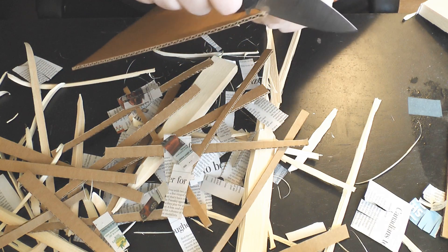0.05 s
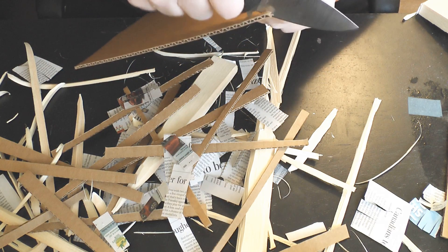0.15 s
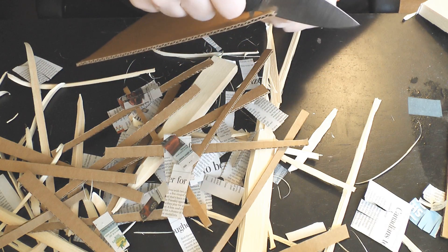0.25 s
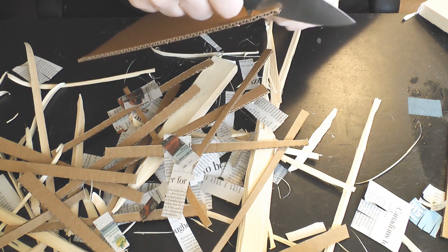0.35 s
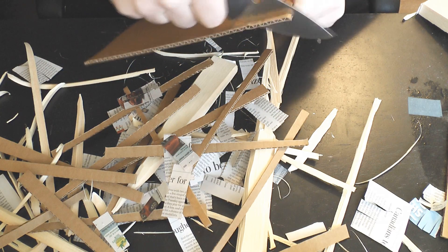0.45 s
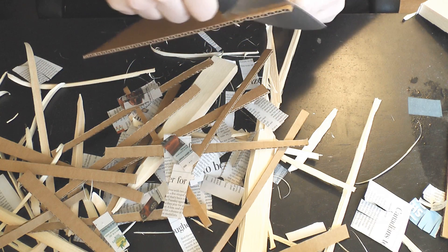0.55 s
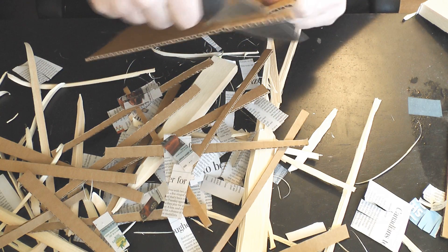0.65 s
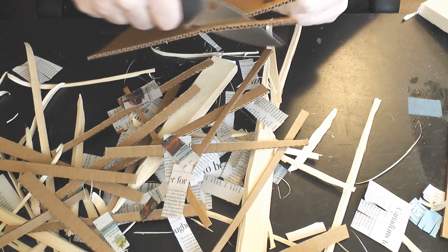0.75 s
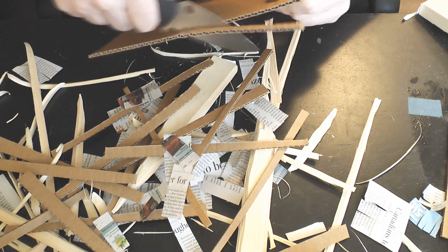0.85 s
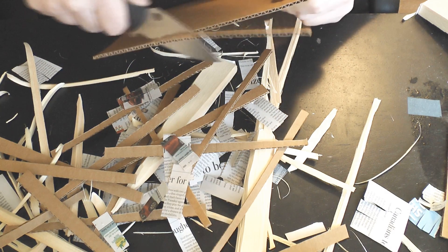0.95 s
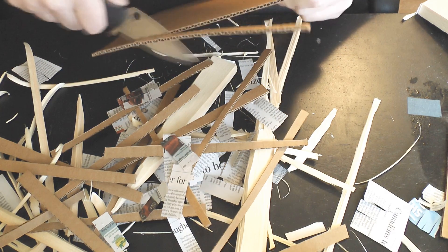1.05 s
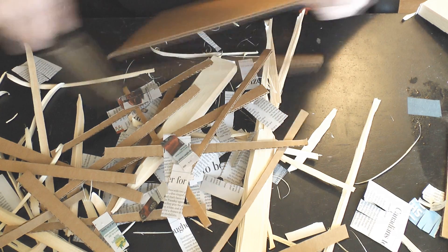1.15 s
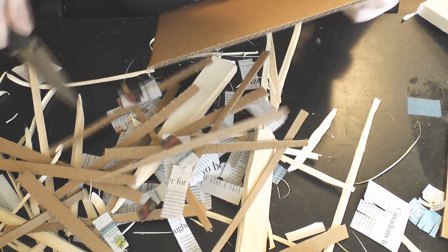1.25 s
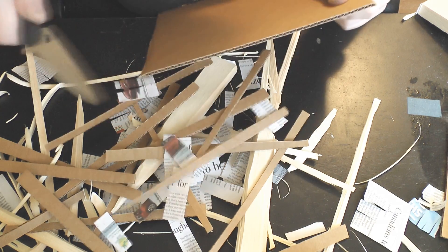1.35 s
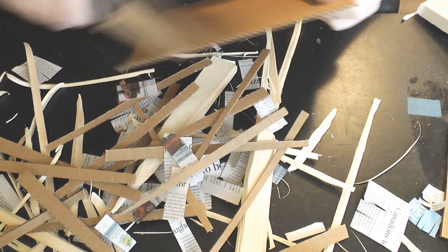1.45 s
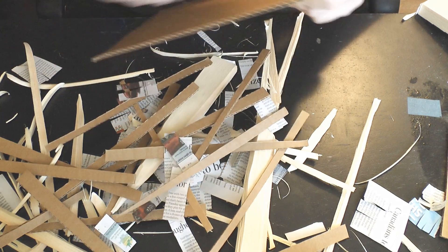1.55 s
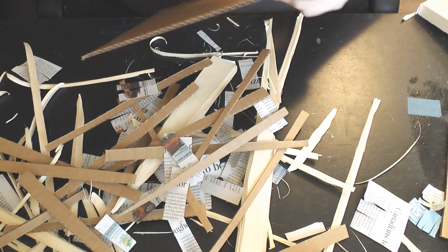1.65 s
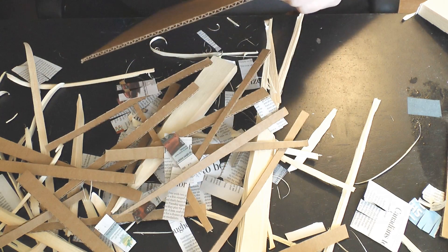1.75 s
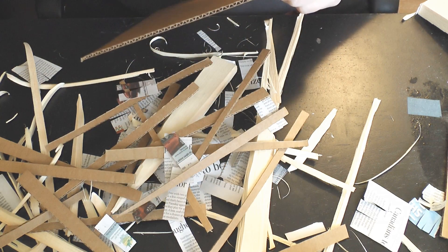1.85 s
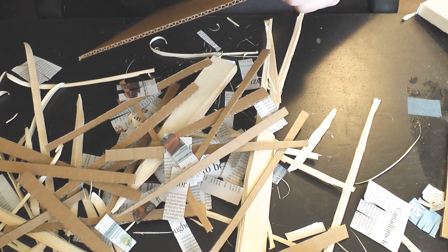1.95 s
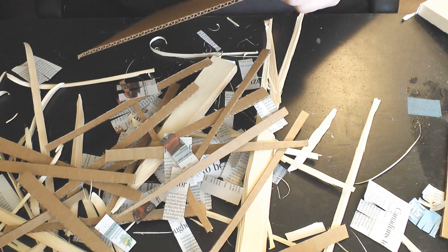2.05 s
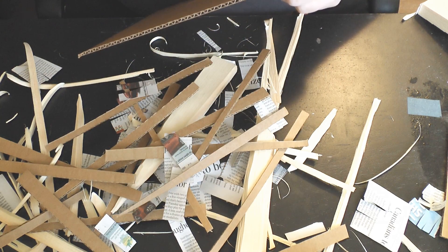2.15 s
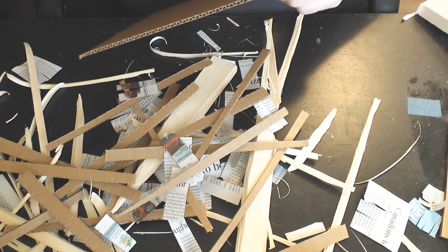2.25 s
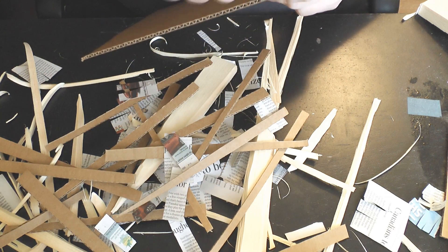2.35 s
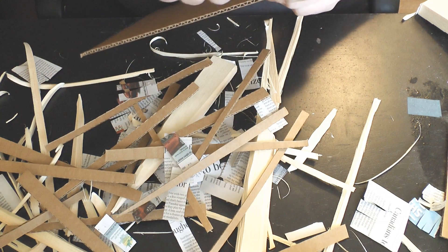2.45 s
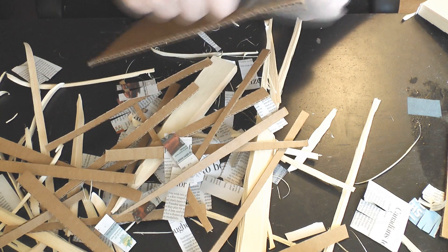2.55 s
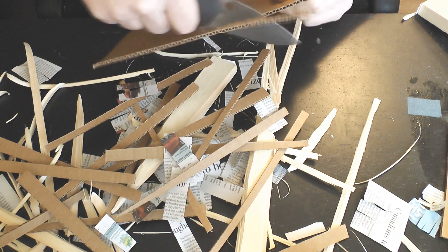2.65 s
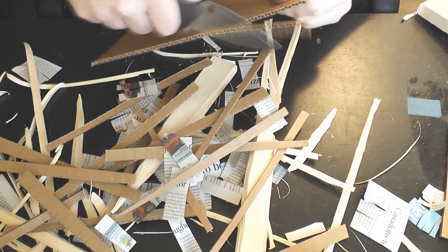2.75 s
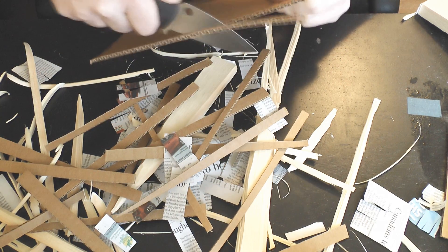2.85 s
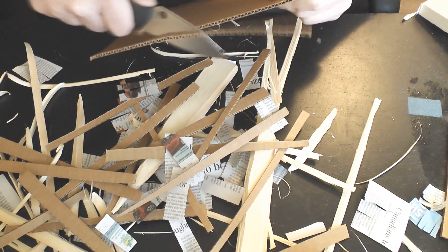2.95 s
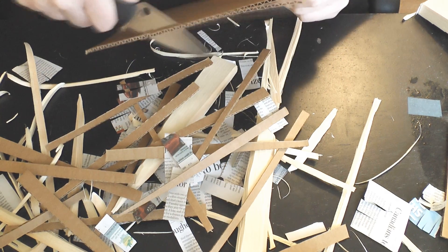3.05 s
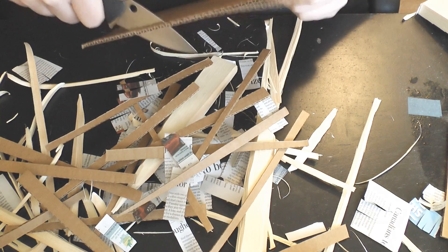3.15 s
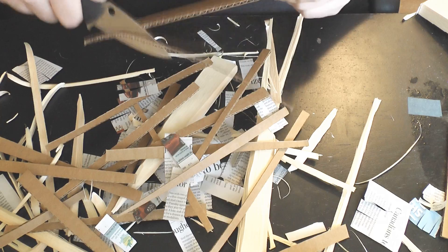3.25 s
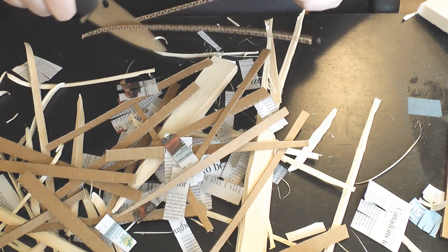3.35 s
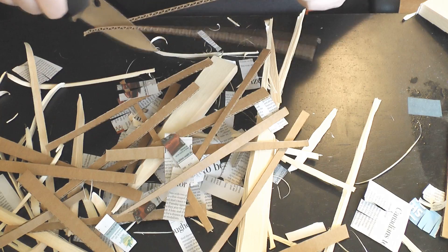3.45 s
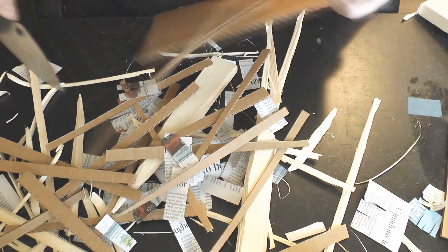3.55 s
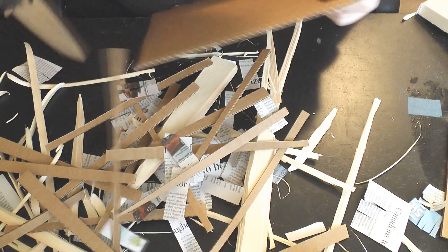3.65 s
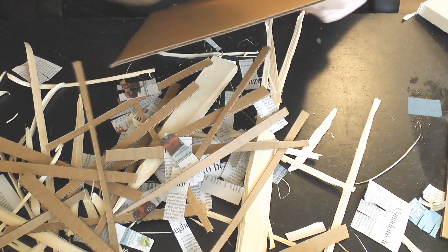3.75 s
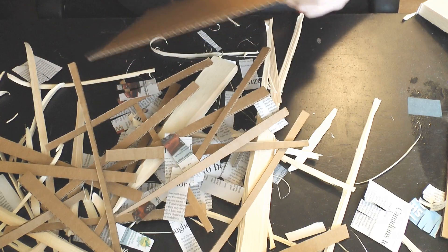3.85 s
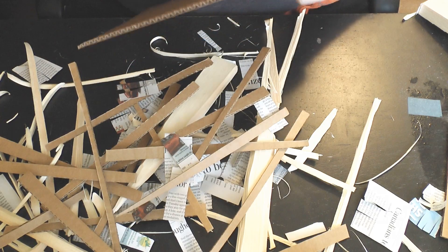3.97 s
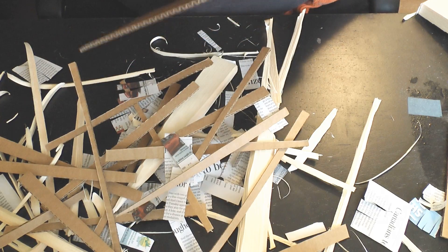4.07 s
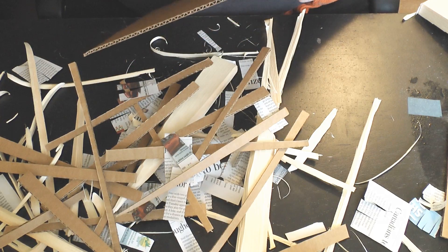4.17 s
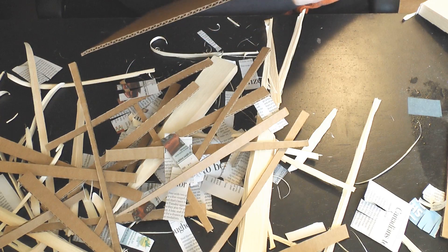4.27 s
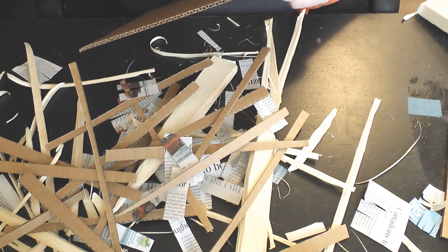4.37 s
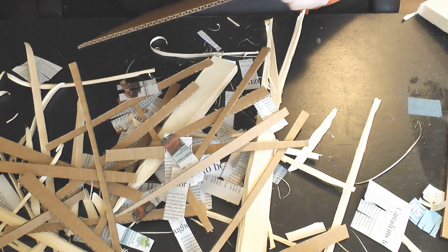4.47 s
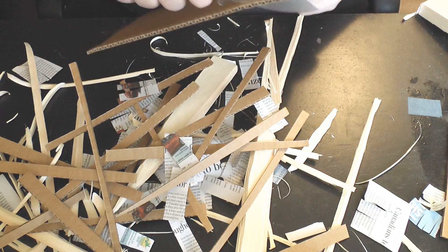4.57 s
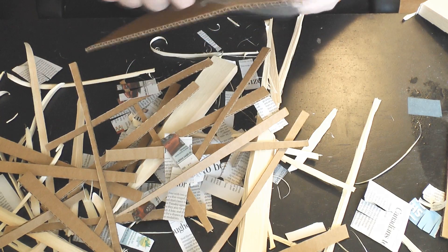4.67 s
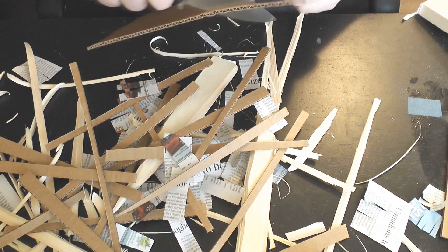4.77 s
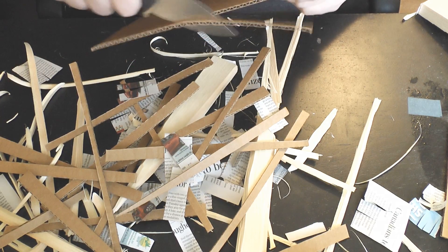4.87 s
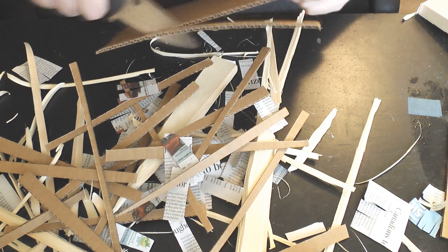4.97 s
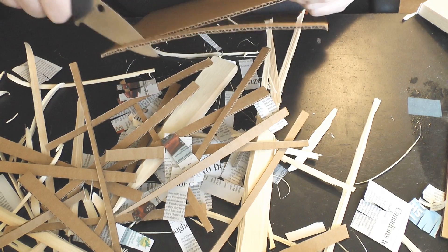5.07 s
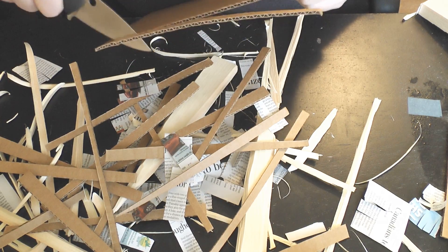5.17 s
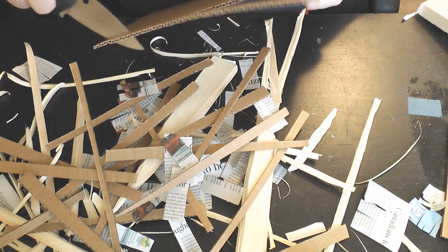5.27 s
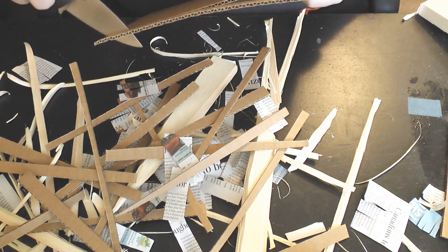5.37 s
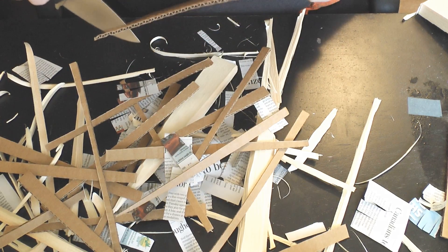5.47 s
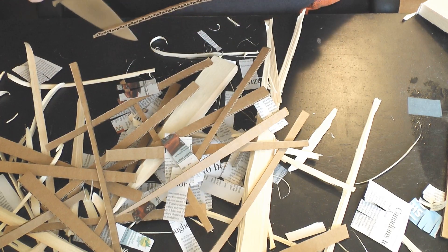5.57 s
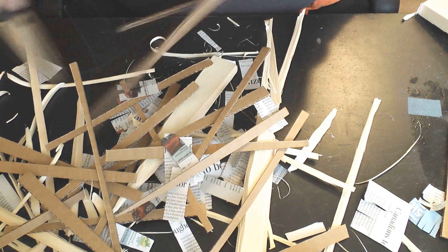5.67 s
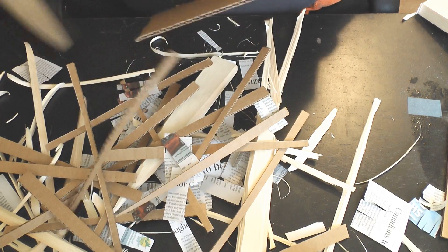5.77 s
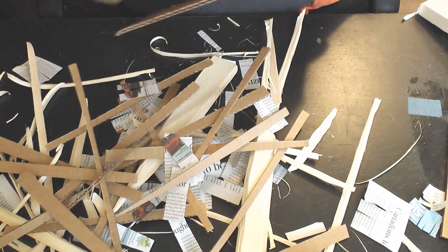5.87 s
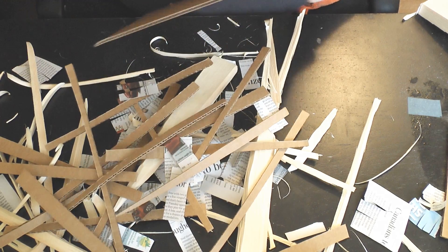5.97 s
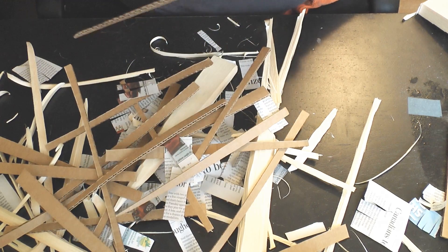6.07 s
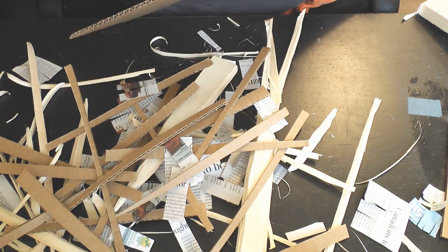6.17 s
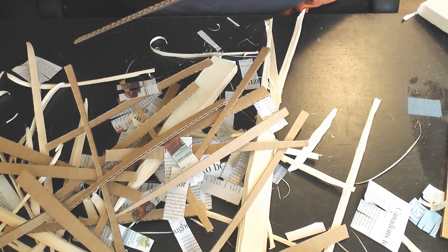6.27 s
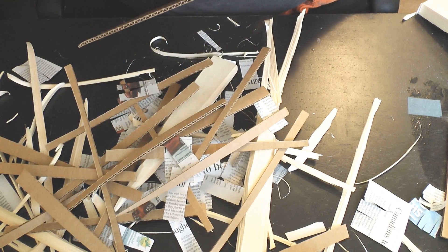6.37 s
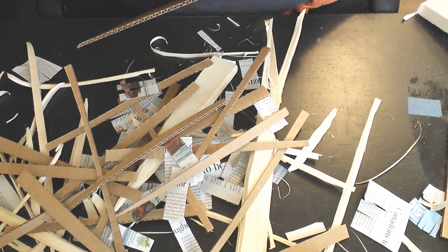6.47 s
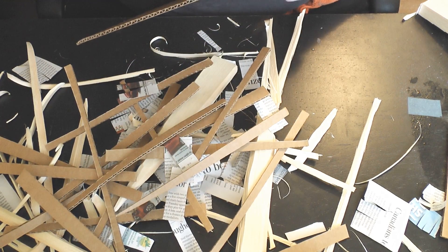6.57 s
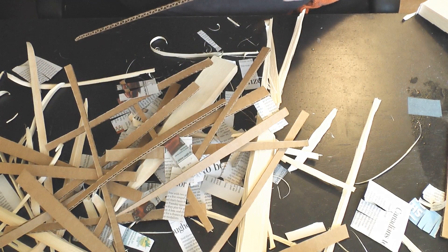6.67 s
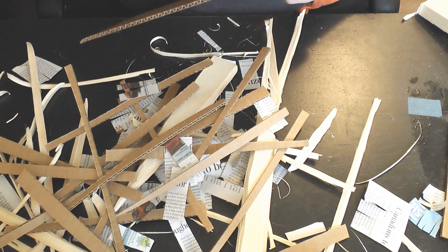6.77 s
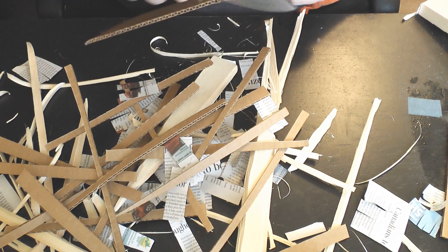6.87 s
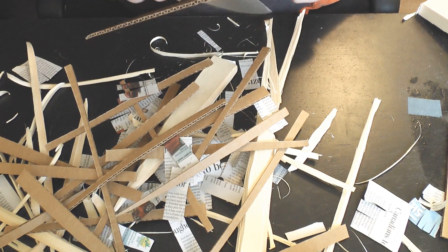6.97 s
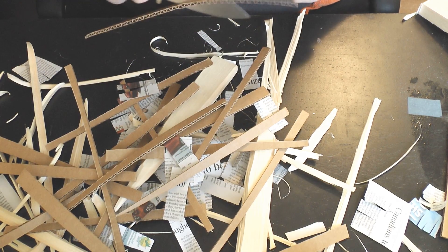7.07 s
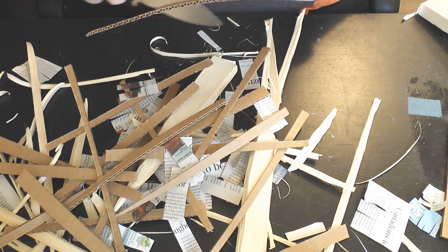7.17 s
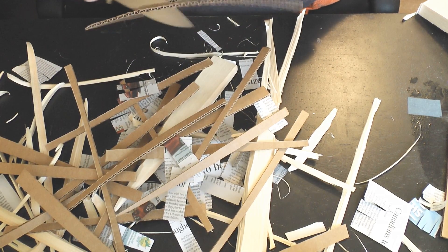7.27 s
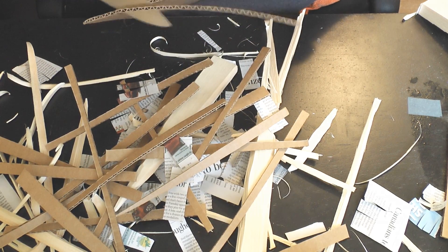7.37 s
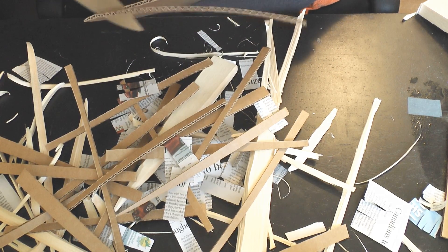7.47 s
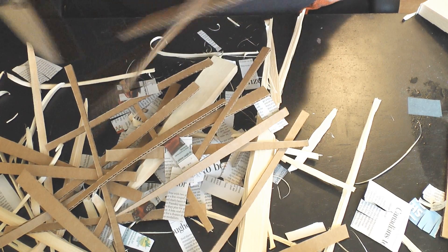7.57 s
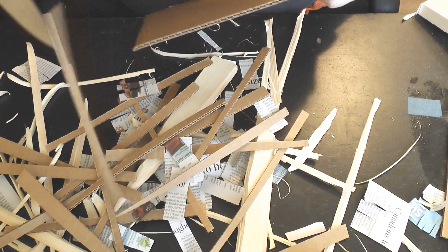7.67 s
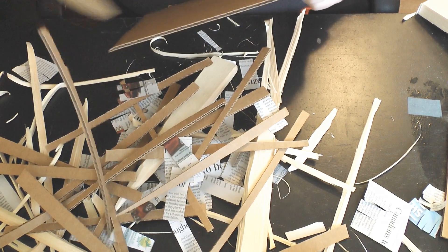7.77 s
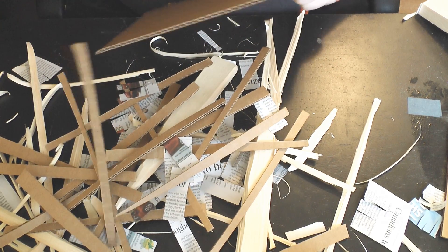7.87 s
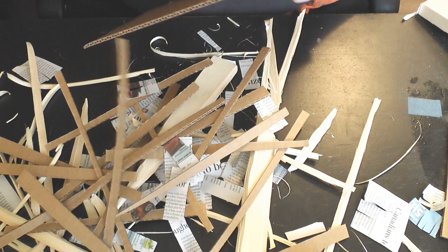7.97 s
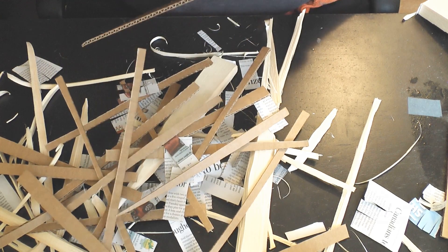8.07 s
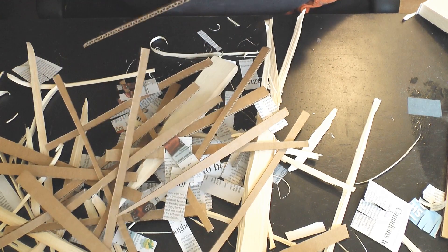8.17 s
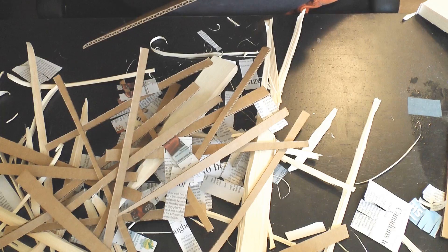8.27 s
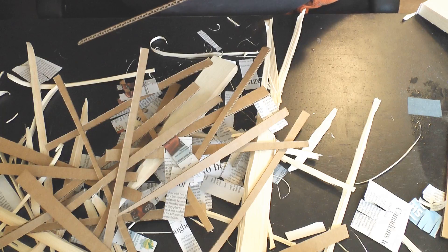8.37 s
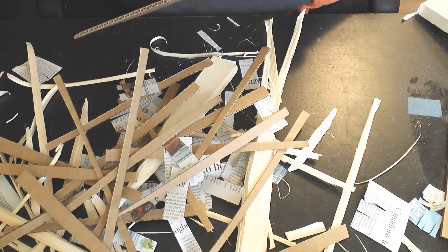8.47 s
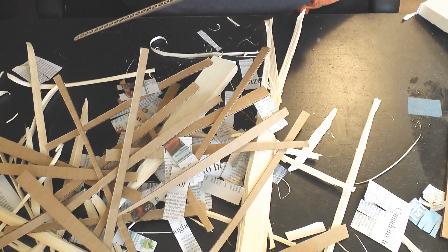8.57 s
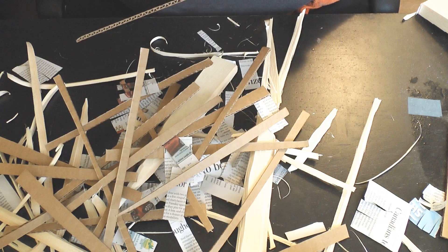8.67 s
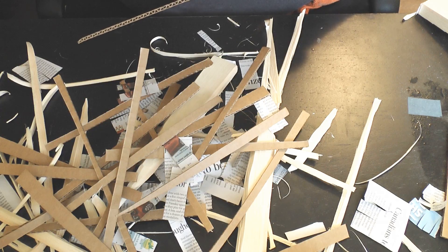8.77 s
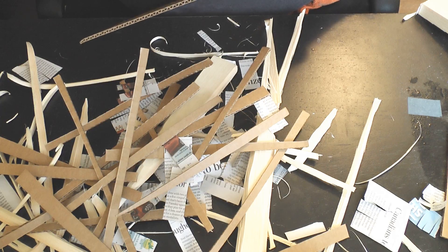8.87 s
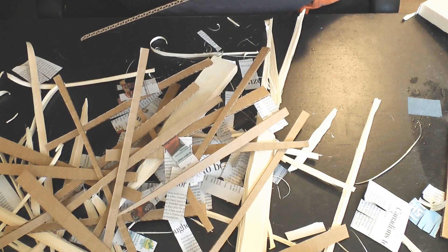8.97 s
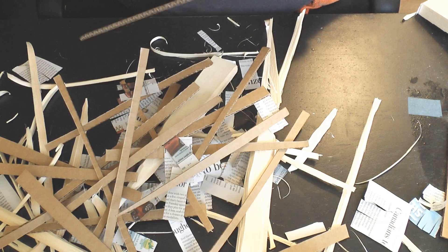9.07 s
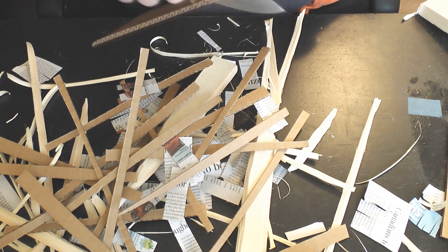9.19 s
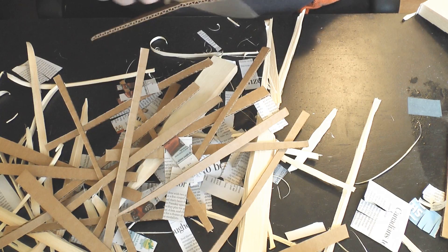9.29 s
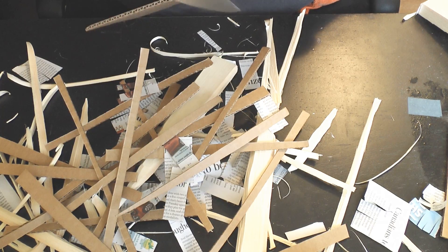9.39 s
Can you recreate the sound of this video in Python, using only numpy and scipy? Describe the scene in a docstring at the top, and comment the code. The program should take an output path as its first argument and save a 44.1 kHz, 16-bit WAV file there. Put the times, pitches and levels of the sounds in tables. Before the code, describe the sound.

Close, dry perspective in a small quiet room with a short reverberant tail and faint steady air. From 0 to 1.4 s a knife ticks on the edge of a corrugated cardboard sheet and rasps through in uneven pushes, gritty and bright, the sheet drumming underneath. A hard snap and low fluttering flap around 1.2 s free the strip; scraps tap the pile until 1.7 s, followed by soft rubbing and faint thin squeaks near 2 s. A second cut runs 2.3-3.8 s, its strip landing around 3.6 s. A third goes 4.25-5.8 s, snapping through at 5.6 s, then light drops and rubbing to 6.3 s. A fourth, 6.5-7.75 s, ends with a clear drop at 7.5 s and a low wobbling flap. Small taps and rustles continue to 8.5 s. At 8.8 s the fifth cut ticks in and rasps in separate strokes to the end, around 9.4 s.

```python
"""Cutting corrugated cardboard

A knife slices strips off a hand-held sheet of corrugated cardboard, over a table in a small room.
The blade ticks onto the edge and rasps through the flutes: coloured noise surging with every push.
The sheet drums as the cut deepens, then flaps free as a group of wandering sine modes.
Strips drop on a pile of offcuts as decaying noise bursts; rubs and thin squeaks are swelling noise."""
import sys
import numpy as np
from scipy import signal
from scipy.fft import rfft, irfft, next_fast_len
from scipy.io import wavfile
from scipy.ndimage import uniform_filter1d, map_coordinates

SR = 44100
rng = np.random.default_rng(int(sys.argv[2]) if len(sys.argv) > 2 else 0)


def bounce(signal):
    """Save signal as a 16-bit WAV file at the path given by the first command-line argument."""
    frames = np.transpose(np.atleast_2d(signal))
    limited = np.clip(frames, -1, 1)
    pcm = np.round(limited * 32767).astype(np.int16)
    wavfile.write(sys.argv[1], SR, pcm)


N = 415863  # length in samples


def amp(db):
    """Decibels to gain."""
    return 10 ** (np.asarray(db) / 20)


def unit(x):
    """Scale to rms 1."""
    return x / np.sqrt(np.mean(x ** 2) + 1e-20)


def along(points, hz):
    """Read (frequency, value) points on a log frequency axis."""
    f, v = np.transpose(points)
    return np.interp(np.log(hz + 1), np.log(f), v)


def wobble(rate):
    """A smooth random curve with this many knots a second."""
    knots = rng.standard_normal(int(N * rate / SR) + 4)
    return map_coordinates(knots, [np.arange(N) * rate / SR])


def filtered(x, gain):
    """Apply a gain that depends on frequency."""
    size = next_fast_len(N + SR // 2)
    hz = np.fft.rfftfreq(size, 1 / SR)
    return irfft(rfft(x, size) * gain(hz), size)[:N]


def coloured(x, spectrum, rings=(), size=4096):
    """Pass x through a causal filter of energy 1: a spectrum with resonances on it."""
    hz = np.fft.rfftfreq(size, 1 / SR)
    db = along(spectrum, hz)
    for ring_hz, width_hz, boost_db in rings:
        db = db + boost_db / (1 + (2 * (hz - ring_hz) / width_hz) ** 2)
    # folding the cepstrum makes the filter minimum phase
    cepstrum = irfft(np.log(amp(db) + 1e-6))
    cepstrum[1:size // 2] *= 2
    cepstrum[size // 2 + 1:] = 0
    response = irfft(np.exp(rfft(cepstrum)))
    return signal.oaconvolve(x, response / np.linalg.norm(response))[:N]


def add(track, start_s, sound):
    """Mix a sound into the track at its start time."""
    part = track[max(round(start_s * SR), 0):][:len(sound)]
    part += sound[:len(part)]


def fibres(rate, spread_db, friction):
    """Tiny breaks of uneven size, on average rate a second, over smooth friction noise."""
    sizes = amp(spread_db * np.clip(rng.standard_normal(N), -2, 2)) * rng.choice([-1, 1], N)
    breaks = unit(sizes * (rng.random(N) < rate / SR))
    return unit(breaks + friction * rng.standard_normal(N))


def burst(t60):
    """A puff of crushing paper: decaying noise of peak envelope 1, cut off after 0.2 s."""
    t = np.arange(SR // 5) / SR
    return rng.choice([-1, 1], len(t)) * amp(-60 * t / max(t60, .002))


# colour of the quiet room air: hz, level_db (per Hz, relative)
AIR_COLOUR = [(15, -53), (25, -18), (175, -9.5), (242, -7), (293, -15), (695, -15), (988, -25),
              (1650, -11.5), (2350, -11), (5570, -22), (8140, -33), (14000, -39), (16000, -42)]


def air():
    """The quiet room: steady noise in a fixed colour."""
    return amp(-54.5) * coloured(rng.standard_normal(N), AIR_COLOUR)


# the blade sits in the board and drags lightly, pushed or not: start_s, end_s, drag_db
CUTS = [(0.0, 1.374, -50), (2.302, 3.802, -46), (4.248, 5.825, -48), (6.48, 7.765, -44),
        (8.796, 9.432, -45.5)]
# pushes of the knife: start_s, attack_s, hold_s, rasp_db, drum_db (of the sheet, relative to rasp),
# hiss_db (fine fibres, relative to rasp)
PUSHES = [ (0.007, 0.059, .039, -35, -13, -7.5), (0.245, 0.046, 0.019, -29.5, -16.5, -14),
          (0.368, 0.027, 0.021, -23, -20.5, -10), (0.42, 0.018, 0.011, -27.5, -8.5, -7),
          (0.489, .035, .005, -32, -13, -9), (0.565, 0.093, 0.021, -24.5, -13.5, -5),
          (0.682, 0.022, 0.26, -29, -8, -2.5), (0.978, 0.015, 0.045, -30.5, -7, -4),
          (1.043, 0.042, 0.047, -24.5, -6, -1.5), (1.146, 0.023, 0.069, -37.5, -8.5, -2),
          (2.325, 0.019, .005, -31.5, -22.5, -8), (2.467, 0.059, 0.06, -24.5, -15.5, -8),
          (2.598, .018, 0.051, -35.5, -5.5, -4), (2.71, 0.056, 0.023, -33, -9, -3.5),
          (2.8, 0.13, 0.04, -29.5, -8, -3.5), (3.035, 0.029, 0.0098, -28.5, -6.5, -5.5),
          (3.171, 0.026, 0.021, -26.5, -8.5, -3.5), (3.323, .048, 0.066, -33.5, -10.5, -4.5),
          (3.445, 0.034, .003, -27.5, -10.5, 1), (3.501, 0.027, .009, -33, -14, -1),
          (3.588, 0.11, 0.031, -44.5, -6.5, -4), (4.283, .021, 0.13, -34.5, -18, -7),
          (4.442, .069, 0.015, -24, -14, -5.5), (4.584, 0.093, 0.027, -28, -10.5, -6.5),
          (4.747, 0.046, 0.036, -27.5, -8, -5.5), (4.814, .14, 0.084, -27.5, -9.5, -5),
          (5.201, 0.036, 0.025, -34.5, -9, -2.5), (5.38, 0.044, 0.053, -45, -10, -2),
          (5.584, .05, 0.0046, -28, -6.5, 0), (5.64, .016, 0.11, -52, 1, 0),
          (6.51, 0.034, .005, -32.5, -18, -3), (6.633, 0.046, 0.06, -25, -14.5, -7.5),
          (6.757, 0.088, 0.058, -27, -9.5, -4), (6.929, 0.15, 0.22, -31, -8.5, -2.5),
          (7.302, 0.068, 0.1, -29.5, -12, -2.5), (7.49, 0.015, 0.0093, -26, -9, 2),
          (7.633, .014, 0.05, -41.5, 1.5, -2.5), (8.825, .008, 0.027, -35, -17, -3),
          (8.884, 0.062, 0.016, -39, -15, -2.5), (9.047, 0.058, 0.031, -23, -13, -5),
          (9.178, 0.097, 0.017, -32, -11, -2), (9.336, 0.064, .05, -33.5, -14.5, -0.5)]
DRAG_DRUM_DB, DRAG_HISS_DB = -9.5, -8.5  # drumming and hiss relative to the drag
DRAG_FADE_S = 0.052  # time to enter or leave the board
BITE_DB, RELEASE_DB_PER_S = 15, 375  # swell over a push's attack; fall rate after its hold
UNSTEADY_DB, UNSTEADY_PER_S = 0.4, 28  # the hand never presses quite evenly


def effort():
    """Pushes swell, hold and let go on top of the drag: rasp dB, then drum and hiss dB relative to it."""
    t = np.arange(N) / SR
    power = np.full((3, N), amp(-120) ** 2)  # rasp, drum, hiss
    for start, end, db in CUTS:
        inside = np.clip(np.minimum(t - start, end - t) / DRAG_FADE_S + .5, 0, 1)
        levels = amp(db + np.array([0, DRAG_DRUM_DB, DRAG_HISS_DB]))
        power += np.outer(levels, inside) ** 2
    for start, attack, hold, db, drum_db, hiss_db in PUSHES:
        near = slice(*np.searchsorted(t, [start - attack, start + attack + hold + .5]))
        age = t[near] - start
        bite_db = -BITE_DB * np.maximum(1 - age / attack, 0) ** 2
        release_db = -RELEASE_DB_PER_S * np.maximum(age - attack - hold, 0)
        levels = amp(db + np.array([0, drum_db, hiss_db]))
        power[:, near] += np.outer(levels, amp(bite_db + release_db)) ** 2
    rasp, drum, hiss = 10 * np.log10(power)
    return rasp + UNSTEADY_DB * wobble(UNSTEADY_PER_S), drum - rasp, hiss - rasp


# the half-cut strip rings along with the blade: start_s, end_s, first_hz, last_hz, boost_db
STRIP_RINGS = [(0.2, 0.405, 2280, 2230, 10), (0.576, 0.794, 1970, 2300, 8.5), (2.493, 2.584, 6200, 6200, 7),
               (2.574, 2.815, 2180, 2270, 12.5), (2.848, 3.55, 1400, 1390, 3.5),
               (3.037, 3.26, 217, 218, 7.5), (4.62, 4.793, 2160, 2150, 10), (4.916, 5.06, 337, 305, 9.5),
               (5.12, 5.49, 1390, 1460, 11.5), (5.153, 5.49, 3630, 3640, 9), (5.745, 5.793, 327, 330, 16)]


def flexing(x, patchy_db, size=512):
    """The board's resonances drift as it bends, and the strip's own ring glides through the rasp."""
    hz, t, z = signal.stft(x, SR, nperseg=size)
    field = uniform_filter1d(rng.standard_normal(z.shape), size=3, axis=0)  # smooth in pitch
    field = uniform_filter1d(field, size=7, axis=1)  # and in time
    db = patchy_db * unit(field)
    for start, end, first_hz, last_hz, boost_db in STRIP_RINGS:
        held = (t > start) & (t < end)
        centre = np.interp(t[held], [start, end], [first_hz, last_hz])
        half_width = 40 + 0.017 * centre
        db[:, held] += boost_db / (1 + ((hz[:, None] - centre) / half_width) ** 2)
    return signal.istft(z * amp(db), SR, nperseg=size)[1][:N]


# colours of a shallow cut, a deep cut and the drumming sheet: hz, level_db (per Hz, relative)
SHALLOW_COLOUR = [(650, -48.5), (1100, -10.5), (1270, -20), (1410, -4), (1560, -26), (1700, -0.5),
                  (1860, -9), (2130, 0.5), (2760, -3.5), (6310, 0), (7640, -5), (8450, -3), (11400, -11.5),
                  (15100, -3.5), (16000, -26)]
DEEP_COLOUR = [(650, -40), (1100, -13.5), (1290, -11), (1410, 2), (1570, -0.5), (1740, 0.5), (2110, 1),
               (3330, -2.5), (3730, 0), (5100, -0.5), (5650, -1), (10200, -5.5), (11700, -9), (15100, -3.5),
               (16000, -9)]
SHEET_COLOUR = [(29, -52), (50, -16), (75, -8), (128, -0.5), (168, -13.5), (208, -0.5), (296, -6),
                (343, -1), (393, -3), (455, -2.5), (494, -10.5), (572, 1.5), (655, -6), (801, -0.5),
                (905, -15), (1250, -11.5), (1620, -56), (2750, -120)]
# resonances that the scraping rings: hz, width_hz, boost_db
BOARD_RINGS = [(138, 30, 6), (205, 65, 3), (264, 22, 7), (340.3, 33, 4), (765, 300, 2.5), (950, 160, -0.5),
               (1360, 150, 1.5), (1560, 96, -9), (2220, 200, 0)]


def cutting():
    """Fibres break in surges, one for each flute; a deeper cut drums the sheet and recolours the rasp."""
    rasp_db, drum_db, hiss_db = effort()
    flute_hz = 64 * np.exp(.38 * wobble(25))
    flutes = np.cos(2 * np.pi * np.cumsum(flute_hz) / SR)
    # strong drumming counts as a deep cut: 0 shallow, 1 deep
    depth = np.clip((uniform_filter1d(drum_db, SR // 20) + 17.5) / 9, 0, 1)
    catching = 1.66 * wobble(75) + 0.84 * wobble(300)  # dB: the edge sticks and slips
    force = amp(rasp_db) * unit(amp(catching + (1.0 + 0.69 * depth) * flutes))

    scraping = fibres(rate=6000, spread_db=1.0, friction=0.65)
    shallow = coloured(force * np.sqrt(1 - depth) * scraping, SHALLOW_COLOUR, BOARD_RINGS)
    tearing = fibres(rate=3000, spread_db=0.5, friction=0.99)
    tearing += amp(-13.5) * fibres(rate=71, spread_db=2.0, friction=0)  # whole bundles snap now and then
    deep = coloured(force * np.sqrt(depth) * tearing, DEEP_COLOUR, BOARD_RINGS)
    rasp = amp(-0.2) * (shallow + deep)
    hiss = filtered(rasp, lambda hz: 1 / (1 + (8500 / (hz + 1)) ** 8))  # top of the rasp
    edge = rasp - hiss + amp(hiss_db + 4.5) * hiss

    surges = amp(rasp_db + drum_db) * unit(amp(catching + 1.8 * flutes))
    thuds = fibres(rate=1200, spread_db=-0.5, friction=0.39)
    drum = coloured(surges * thuds, SHEET_COLOUR, BOARD_RINGS)
    drum_high = filtered(drum, lambda hz: 1 / (1 + (450 / (hz + 1)) ** 6))
    drum_low = drum - drum_high
    # a deeper cut drums slightly brighter
    body = amp(-0.5 - 0.73 * depth) * drum_low + amp(-1.0 + 0.59 * depth) * drum_high
    return flexing(edge + body, patchy_db=2.5)


# the blade meets the edge or snaps through a liner: start_s, level_db (before trim and colour)
TICKS = [(0.0195, -9), (0.0553, -12), (0.247, -21), (0.371, -24), (1.267, -8.5), (2.344, -12.5),
         (2.3545, -15), (2.484, -6.5), (3.187, -15.5), (3.478, -14), (4.294, -8.5), (4.3045, -12),
         (4.327, -15.5), (4.7734, -9.5), (4.802, -16), (5.516, -21.5), (5.6258, -7.5), (6.5223, -14),
         (7.631, -21.5), (7.671, -14), (8.8315, -12), (8.849, -20)]
# colour of a snap on the stiff edge: hz, level_db (per Hz, relative)
TICK_COLOUR = [(300, -24), (1100, -15), (2200, 2.5), (4000, 1), (6200, 3.5), (11000, -4.5), (15500, -6)]


def ticks():
    """Steel on the stiff edge: one hard snap, the board's brief chatter, then a faint crumble."""
    snaps = np.zeros(N)
    for start_s, level_db in TICKS:
        snap = amp(-5.0) * burst(t60=0.0029)
        chatter = amp(-10.5) * burst(t60=0.023)
        crumble = amp(-18.5) * burst(t60=0.07)
        add(snaps, start_s, amp(level_db) * (snap + chatter + crumble))
    return coloured(snaps, TICK_COLOUR)


# the sheet springs free: start_s, level_db, slow_db and quick_db (bending, relative to level),
# t60_s (slow bending; the quick bending dies in half of it)
FLAPS = [(1.184, -25.5, 6, -5, 0.22), (1.227, -28.5, 0, -3, 0.33), (1.30, -25.5, -9, -18, 0.86),
         (5.625, -29.5, -34, -3, 0.25), (7.580, -24.5, 1.5, -10, 0.44), (7.628, -28, -1, -4, 0.38),
         (7.829, -42.5, 2, -8, 0.6)]
# slow and quick bending modes of the sheet: hz, width_hz (twice the rms pitch wander), level_db
SLOW_MODES = [(58.7, 15, -8), (72, 13, -4.5), (83.7, 19, -3)]
QUICK_MODES = [(137.4, 10, 8), (166.5, 44, -11), (212.5, 43, -2.5), (251, 19, -1.5), (343, 34, -2),
               (417, 58, -2)]


def flaps():
    """Released by the blade, the sheet swings in its bending modes; the loose grip bends their pitch."""
    swing = np.zeros(N)
    t = np.arange(SR) / SR
    onset = 1 - np.exp(-t / 0.0046)
    for start_s, level_db, slow_db, quick_db, t60 in FLAPS:
        families = ((SLOW_MODES, slow_db, t60), (QUICK_MODES, quick_db, 0.5 * t60))
        for modes, bending_db, life in families:
            for hz, width_hz, mode_db in modes:
                wander = unit(uniform_filter1d(rng.standard_normal(SR), SR // 50))
                phase = np.cumsum(hz + .5 * width_hz * wander) / SR + rng.random()
                fade = amp(level_db + bending_db + mode_db - 60 * t / life) * onset
                add(swing, start_s, fade * np.sin(2 * np.pi * phase))
    return swing


# light rubbing as the grip shifts between cuts: peak_s, rise_s (and fall), level_db (at the peak)
RUBS = [(1.42, 0.13, -45), (1.63, 0.14, -40), (1.85, 0.24, -53.5), (3.99, 0.15, -40), (5.88, 0.25, -44),
        (6.12, 0.085, -38.5), (6.31, .08, -48.5), (7.83, .12, -46.5), (7.99, 0.11, -42), (8.14, 0.2, -49.5),
        (8.47, .07, -47)]
# colour of rubbing card: hz, level_db (per Hz, relative)
RUB_COLOUR = [(180, -31), (300, -12), (486, -8), (656, -14), (762, -1.5), (978, -17.5), (1430, -7.5),
              (2070, -0.5), (2650, -8), (6200, -0.5), (8640, -6.5), (14200, -10.5), (16000, -6.5)]
RUB_SWELL_DB = 14.5  # gained over the rise, lost over the fall


def rubbing():
    """A soft hiss of rubbing card swells and fades as the hands move back for the next cut."""
    t = np.arange(N) / SR
    swells = sum(amp(db - RUB_SWELL_DB * ((t - peak_s) / rise_s) ** 2) for peak_s, rise_s, db in RUBS)
    uneven = amp(-3.0 + 1.1 * wobble(40))
    grain = fibres(rate=3600, spread_db=6, friction=1)
    return coloured(swells * uneven * grain, RUB_COLOUR, BOARD_RINGS)


# strips and scraps land on the pile: start_s, level_db (before trims and colour),
# knock_db (hollow knock, relative to level), ring_hz
DROPS = [(1.402, -26.5, -10.5, 2530), (1.488, -29, -23, 3400), (1.525, -28, -22, 2070),
         (1.688, -17.5, -23, 2100), (3.617, -22, -32, 3570), (3.675, -30, -10, 1970),
         (4.039, -27.5, -9, 2190), (4.101, -30.5, -16, 2550), (5.75, -35, -21, 2250),
         (5.814, -24, -24, 4300), (5.945, -22.5, -28, 2100), (6.277, -28, -12.5, 2310),
         (6.329, -32.5, -15, 2710), (7.526, -15, -17.5, 2160), (7.704, -19.5, -26, 2110),
         (8.117, -28.5, -6, 2330), (8.194, -28.5, -23, 2420), (8.346, -38.5, -5, 2040),
         (8.431, -37, -6, 1900), (8.484, -27.5, -11.5, 2240)]
# colours of a tapping scrap and of the pile's knock: hz, level_db (per Hz, relative)
SCRAP_COLOUR = [(500, -4.5), (1200, -1), (2200, 9.5), (3500, 7), (7000, 0), (15000, -17)]
KNOCK_COLOUR = [(100, -24), (350, -10), (570, 2.5), (800, -4), (1000, -6.5), (1500, -8), (2500, -23),
                (6000, -35)]


def drops():
    """Each light strip taps, rings and slithers to rest on the pile, which answers with a hollow knock."""
    pile = np.zeros(N)
    for start_s, level_db, knock_db, ring_hz in DROPS:
        slither = amp(-13) * burst(t60=0.48)
        tap = coloured(burst(t60=0.049) + slither, SCRAP_COLOUR, [(ring_hz, 300, 9)])
        knock = coloured(burst(t60=0.036), KNOCK_COLOUR)
        add(pile, start_s, amp(level_db - 9.5) * tap + amp(level_db + knock_db - 1.5) * knock)
    return pile


# faint high squeaks in the first pause: peak_s, half_length_s, level_db
SQUEAKS = [(1.965, 0.01, -44), (2.178, .014, -54)]
# colour of a squeak: hz, level_db (per Hz, relative)
SQUEAK_COLOUR = [(3000, -38), (5500, -4), (9000, -9), (12000, -11), (16000, -16)]
# resonances of a squeak: hz, width_hz, boost_db
SQUEAK_RINGS = [(6120, 440, 20), (8900, 450, 22), (11850, 500, 17)]


def squeaks():
    """Brief, thin squeaks: friction noise in three narrow resonances."""
    t = np.arange(N) / SR
    swells = sum(amp(db) * np.exp(-((t - peak_s) / half_s) ** 2) for peak_s, half_s, db in SQUEAKS)
    return coloured(swells * rng.standard_normal(N), SQUEAK_COLOUR, SQUEAK_RINGS)


# reverberation of the small room: hz, t60_s
ROOM_DECAY = [(100, 0.58), (500, 0.5), (2000, 0.54), (6000, 0.49), (15000, 0.24)]


def room(x):
    """The walls answer after a few milliseconds; each frequency dies at its own speed."""
    hz, t, z = signal.stft(rng.standard_normal(SR * 3 // 4), SR, nperseg=256)
    decay = amp(-60 * t / along(ROOM_DECAY, hz)[:, None])
    tail = signal.istft(z * decay, SR, nperseg=256)[1]
    tail = np.concatenate([np.zeros(int(.005 * SR)), tail])
    return signal.fftconvolve(x, tail / np.linalg.norm(tail))[:N]


def scene():
    """Knife and cardboard close by, in a quiet room."""
    close = cutting() + ticks() + flaps() + rubbing() + drops() + squeaks()
    return (close + amp(-10.5) * room(close) + air())[None]


TOP_HZ = 15950  # upper band limit


def record(dry):
    """Keep nothing at or above the band limit."""
    return filtered(dry[0], lambda hz: hz < TOP_HZ)[None]


dry = scene()
out = record(dry)
bounce(out)
```